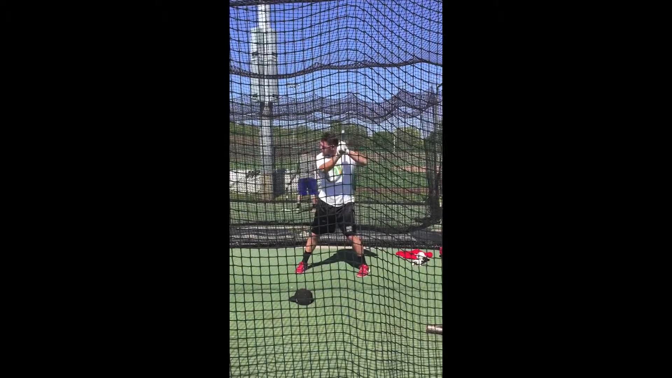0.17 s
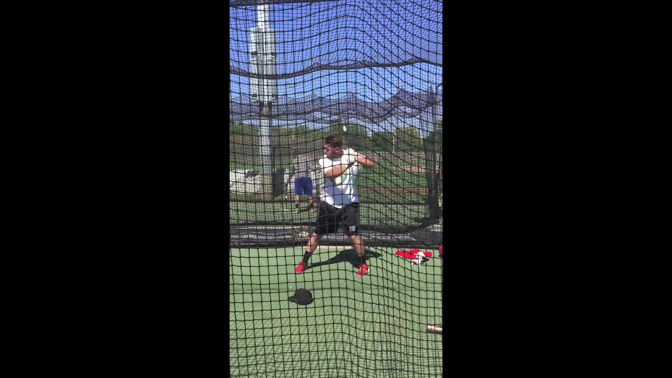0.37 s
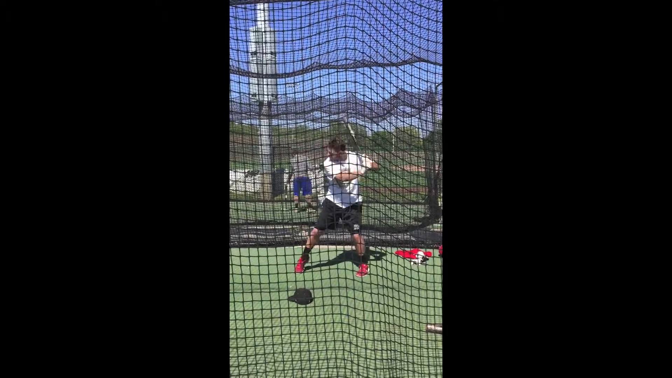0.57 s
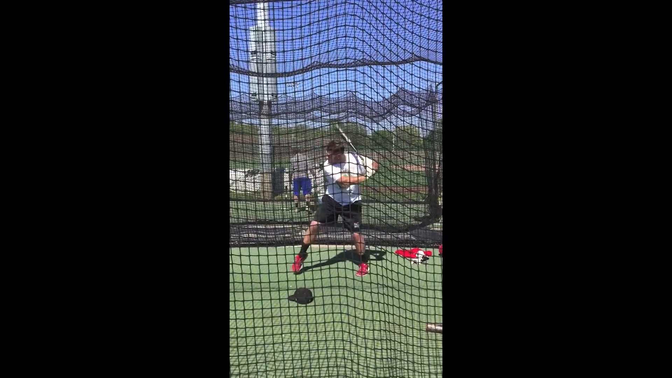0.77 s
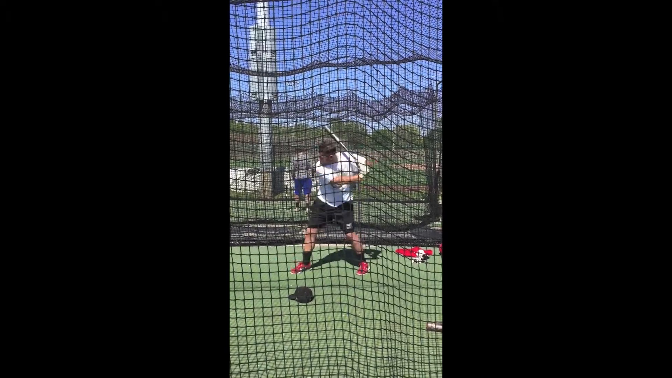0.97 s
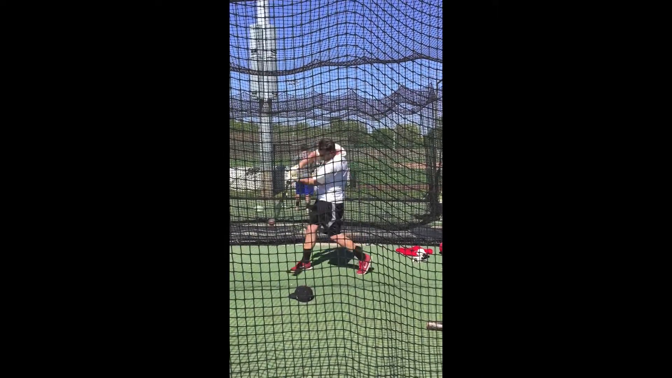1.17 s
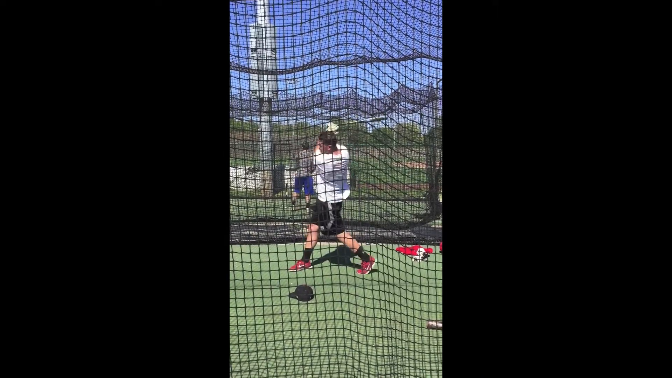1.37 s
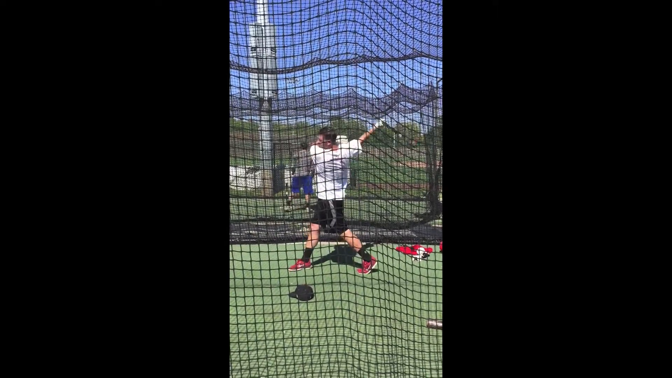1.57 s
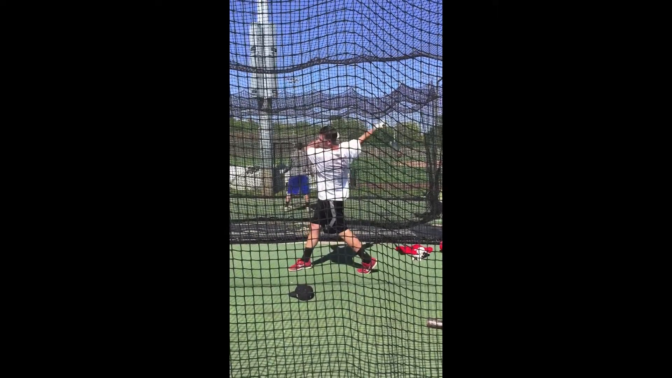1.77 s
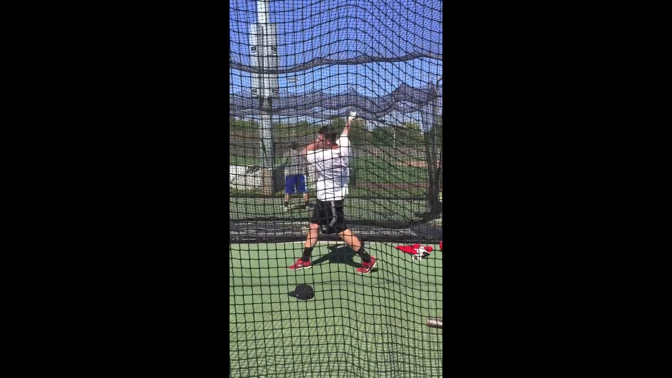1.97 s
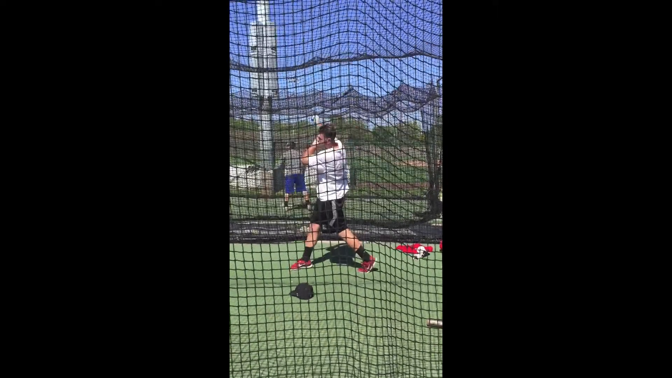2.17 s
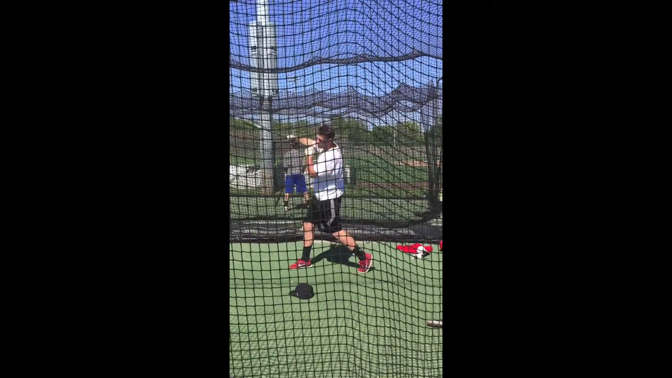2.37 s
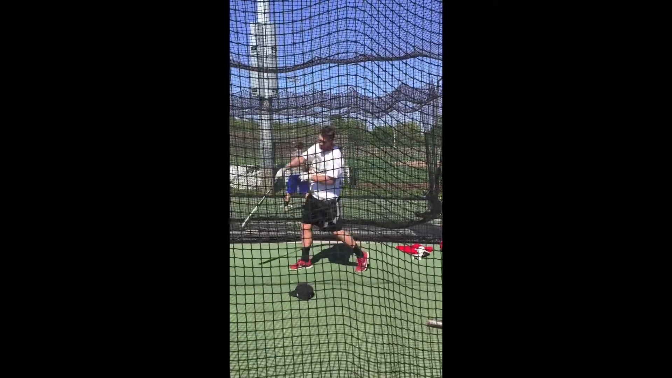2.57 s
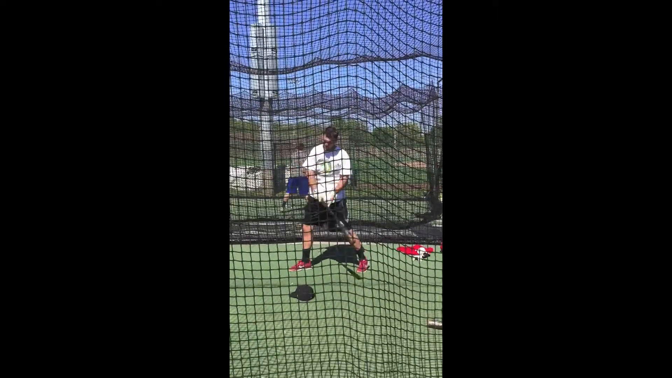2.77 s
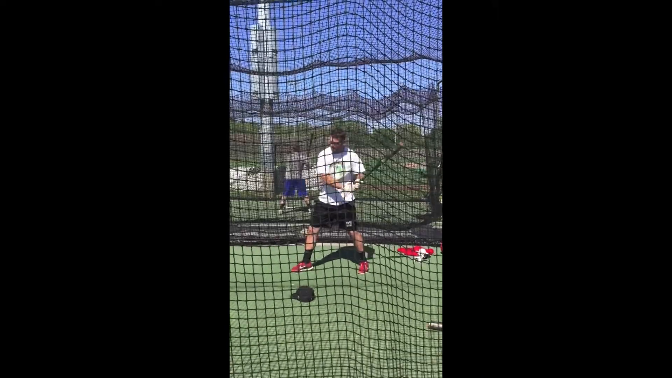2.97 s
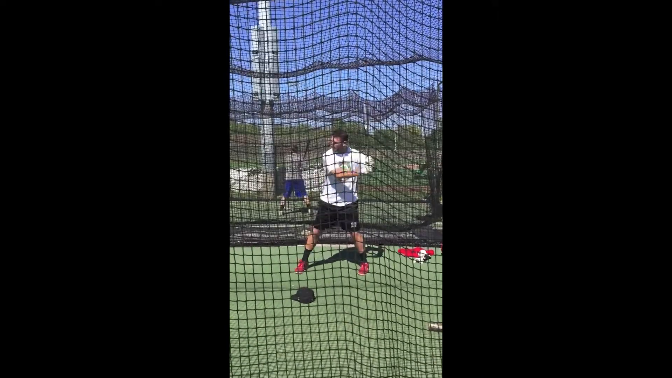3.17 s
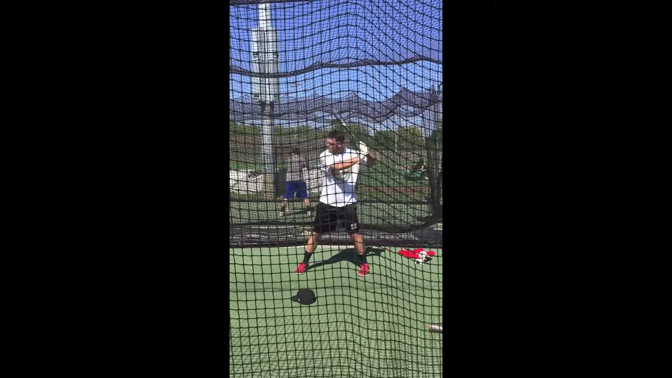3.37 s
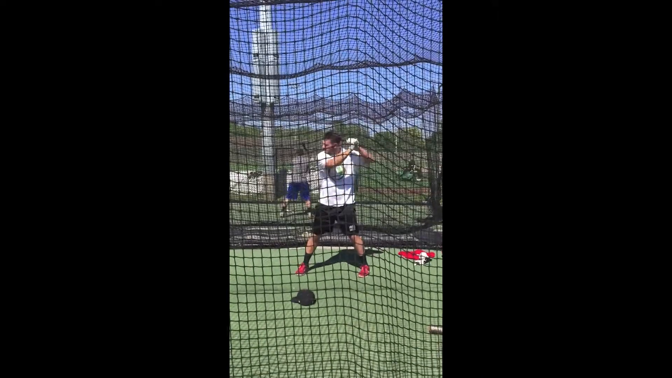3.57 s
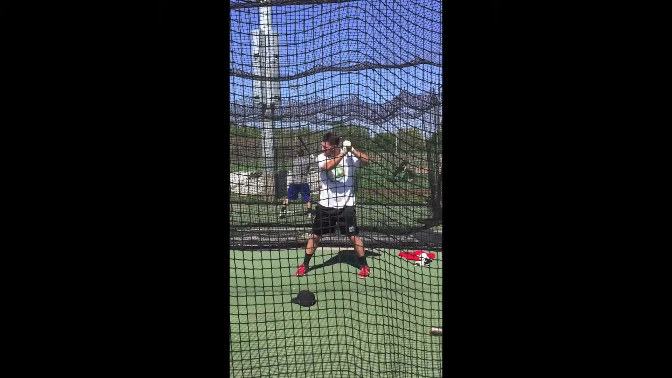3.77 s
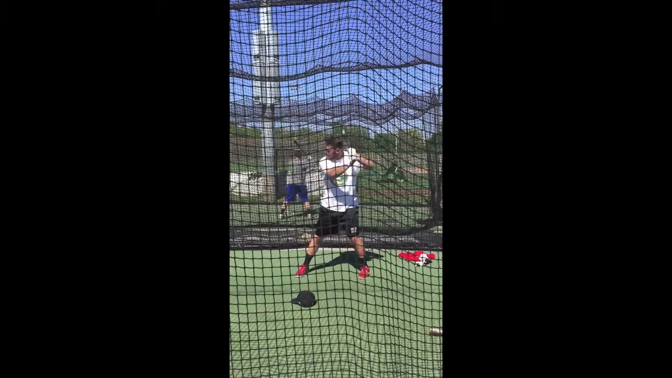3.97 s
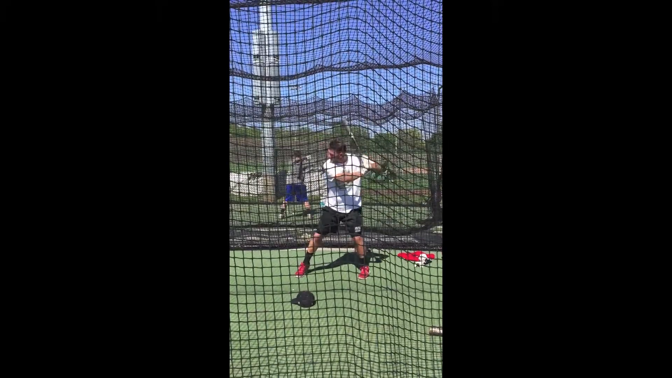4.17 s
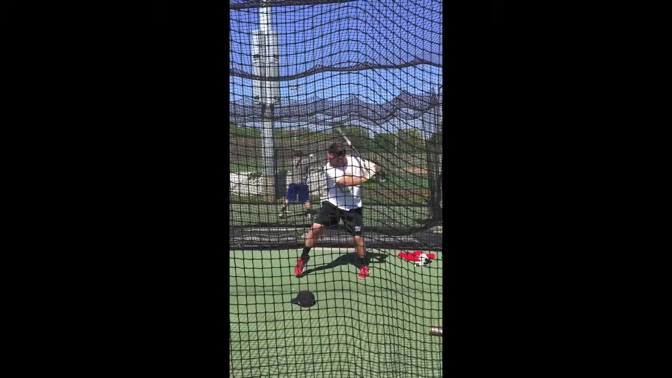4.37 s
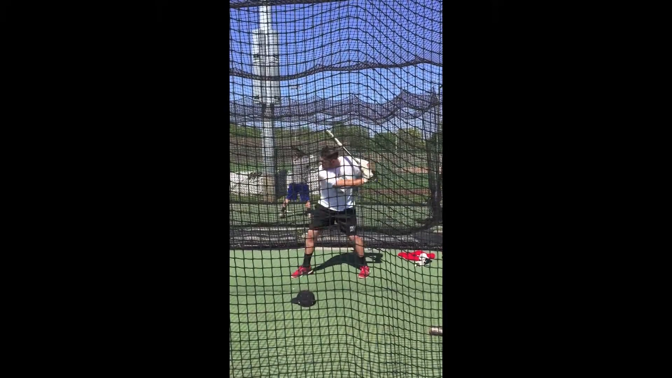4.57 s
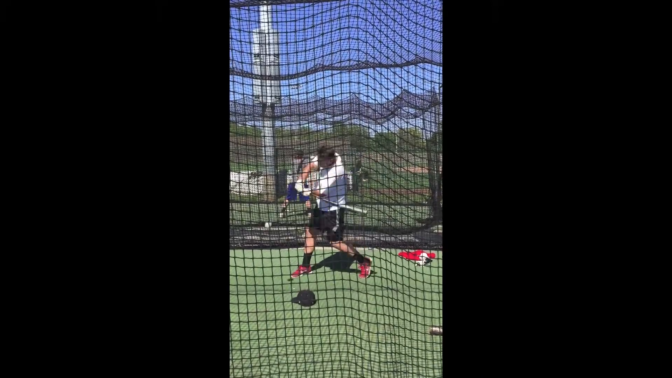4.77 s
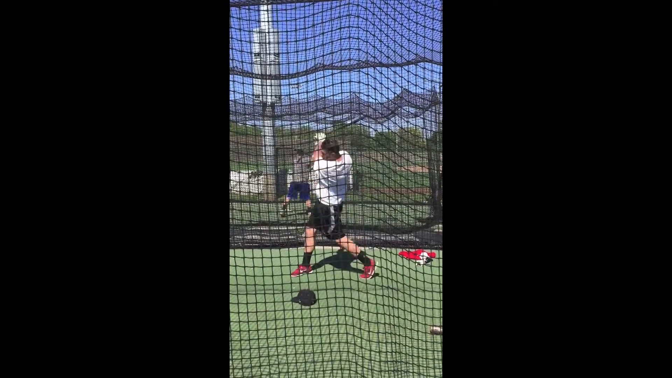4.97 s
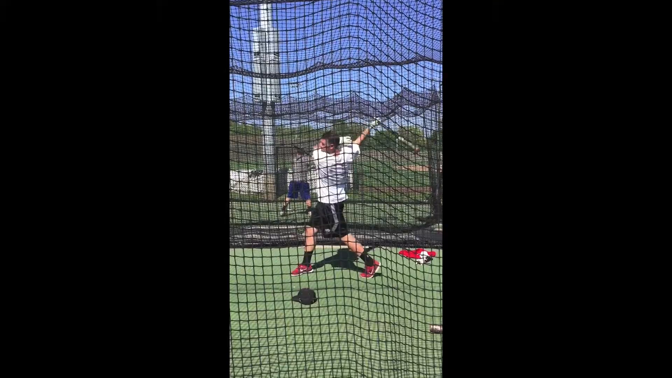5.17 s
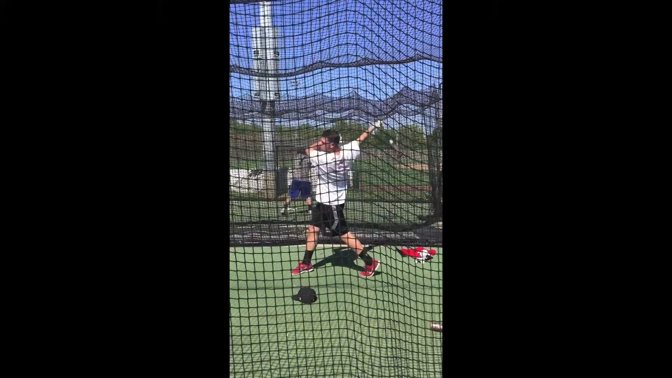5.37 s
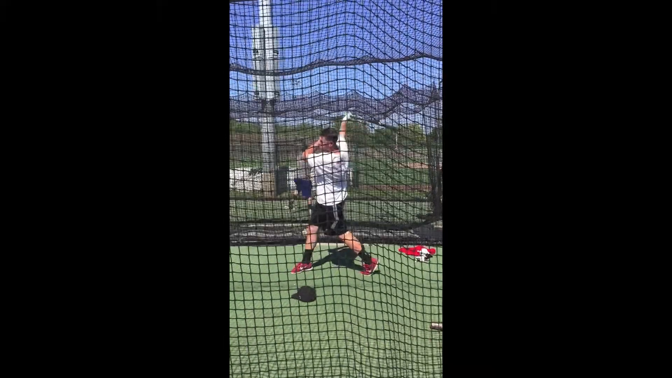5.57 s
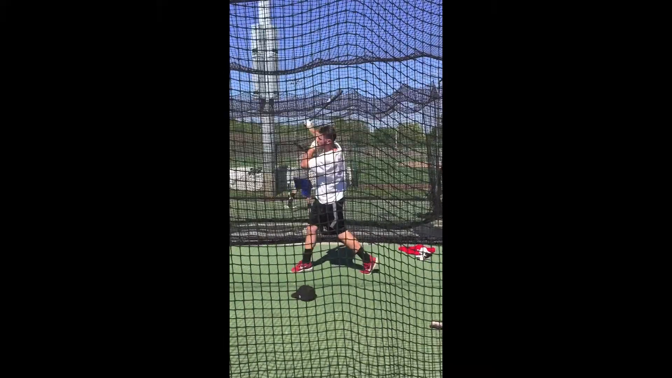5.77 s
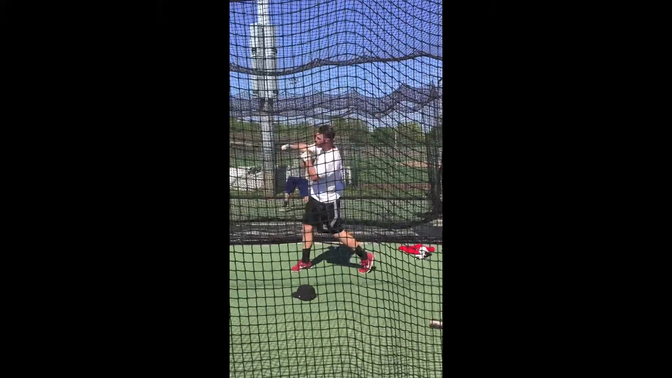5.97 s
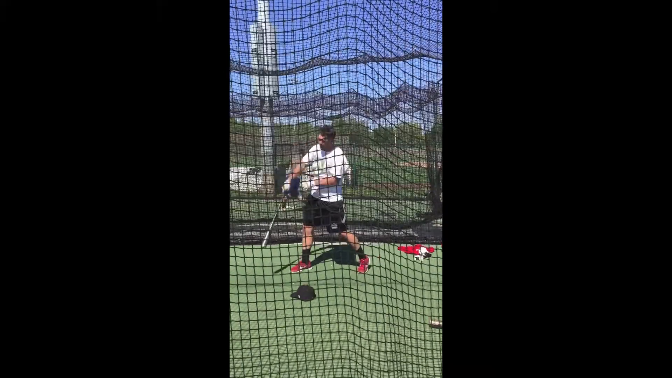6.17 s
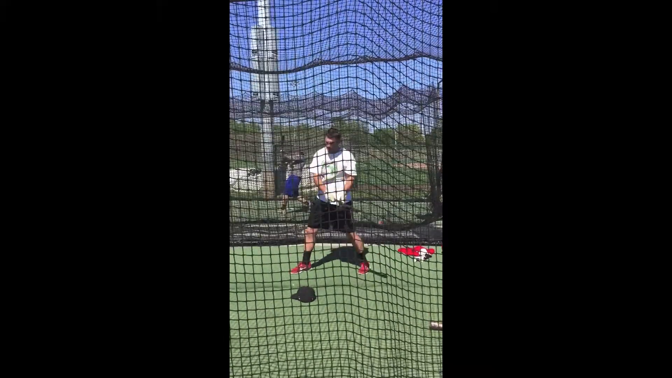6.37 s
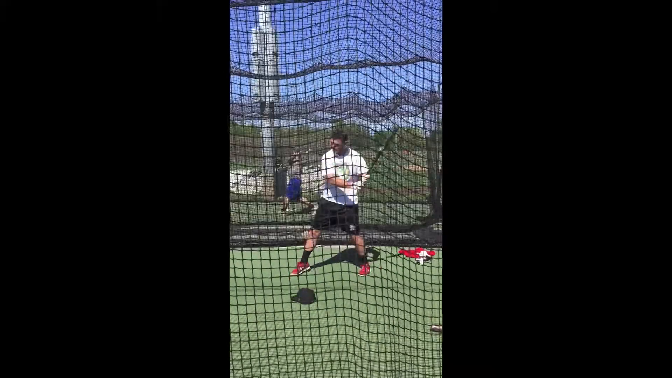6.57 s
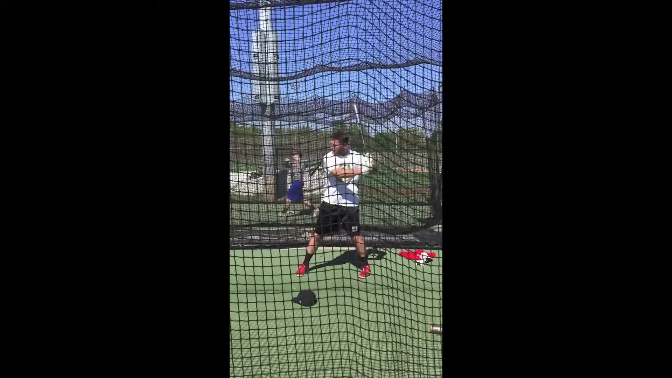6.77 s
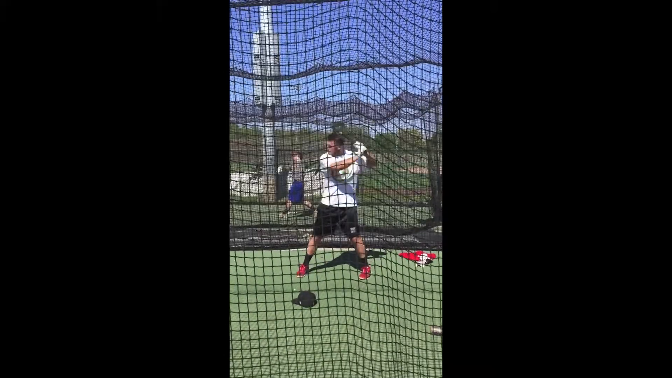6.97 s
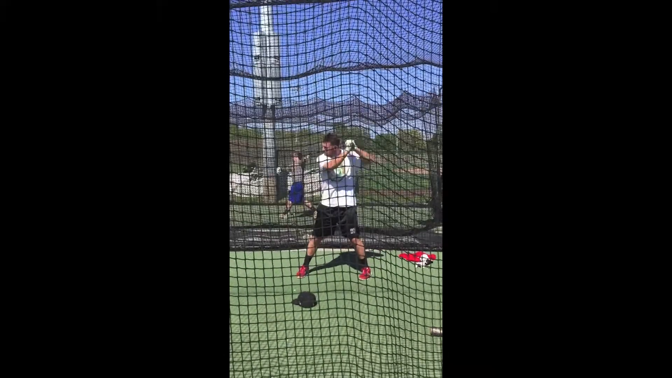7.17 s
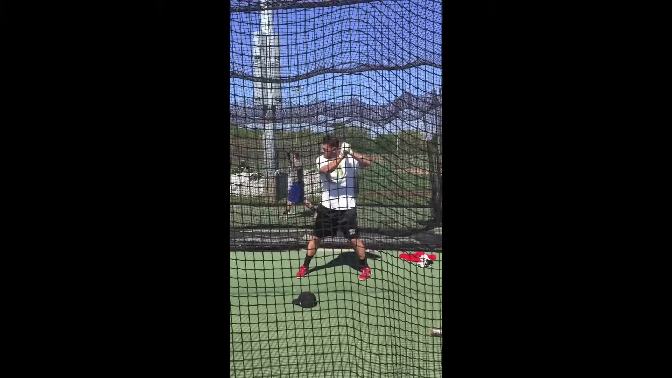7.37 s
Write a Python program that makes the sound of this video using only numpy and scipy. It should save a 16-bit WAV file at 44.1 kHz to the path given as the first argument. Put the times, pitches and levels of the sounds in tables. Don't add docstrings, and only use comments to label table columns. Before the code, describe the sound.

Over a puttering engine and airy hiss, two sharp metallic bat cracks ring and rustle netting, followed by a short dull thud with bounces.

```python
import sys
import numpy as np
from scipy import signal
from scipy.fft import rfft, irfft
from scipy.io import wavfile

SR = 44100
rng = np.random.default_rng(int(sys.argv[2]) if len(sys.argv) > 2 else 0)


def generate_wav(signal):
    frames = np.transpose(np.atleast_2d(signal))
    scaled = np.clip(frames, -1, 1) * 32767
    pcm = np.round(scaled).astype(np.int16)
    wavfile.write(sys.argv[1], SR, pcm)


def gain_from_db(level_db):
    decades = np.asarray(level_db, float) / 20
    return 10 ** decades


N = 327222
TIME = np.arange(N) / SR


def rms_one(x):
    return x / np.sqrt(np.mean(x ** 2) + 1e-20)


def in_time(rows):
    s, *columns = np.transpose(rows)
    return [np.interp(TIME, s, c) for c in columns]


def drift(rate):
    pole = np.exp(-80 * np.pi * rate / SR)
    noise = rng.standard_normal(N // 40 + 2002)
    slow = signal.lfilter([1], [1, -2 * pole, pole * pole], noise)[2000:]
    return np.interp(np.arange(N) / 40, np.arange(len(slow)), rms_one(slow - slow.mean()))


def ring(clicks, hz, t60):
    r, w = 1000 ** (-1 / (t60 * SR)), 2 * np.pi * hz / SR
    return signal.lfilter([0, np.sin(w)], [1, -2 * r * np.cos(w), r * r], clicks + 1e-18)


def coloured(spectrum, patchy_db=0, size=N):
    hz, level_db = np.transpose(spectrum)
    bins = np.maximum(np.arange(size // 2 + 1) * SR / size, 1)
    gain = gain_from_db(np.interp(np.log(bins), np.log(hz), level_db, -90, -90))
    shaped = rfft(rng.standard_normal(size)) * gain
    if not patchy_db:
        return rms_one(irfft(shaped, size))
    out, place = 0, 2 * np.log2(bins / hz[0])
    for k in range(int(2 * np.log2(hz[-1] / hz[0])) + 2):
        band = irfft(shaped * np.clip(1 - abs(place - k), 0, 1), size)
        out = out + band * gain_from_db(patchy_db * drift(22))
    return rms_one(out)


def add(track, s, sound):
    i = round(s * SR)
    track[i:i + len(sound)] += sound[:N - i]


def tones(rows, wobble_db):
    out, wobble = np.zeros(N), gain_from_db(wobble_db * drift(60))
    for centre, half, hz, glide, db in rows:
        t = np.arange(-3 * half, 3 * half, 1 / SR)
        swell = np.exp(-.7 * abs(t / half) ** 3)
        phase = 2 * np.pi * (hz * t + glide * t ** 2 / 2)
        add(out, centre + t[0], gain_from_db(db) * swell * np.sin(phase))
    return out * wobble


# time_s, ahead_firings (of the even speed-up)
HUNTING = [(0, 0), (1.3, -.04), (2.2, .05), (2.8, -.06), (3.9, -.085), (5.2, .085), (6.2, .01), (7.0, .02),
           (7.42, .06)]


def firings():
    ahead, = in_time(HUNTING)
    rate_hz, speed_up_hz_per_s = 20.4, .12
    return .4 + rate_hz * TIME + speed_up_hz_per_s * TIME ** 2 / 2 + ahead


def clatter():
    count = firings() + .1
    jolt = count.astype(int)
    burst = rng.standard_normal(N) * np.exp(-(count % 1) / .1)
    size_db = 4 * np.minimum(rng.exponential(1, 200), 2)
    modes = 0
    for hz in np.geomspace(2300, 13000, 15) * rng.uniform(.96, 1.04, 15):
        strength_db = size_db + rng.normal(0, 7, 200)
        mode = ring(burst * gain_from_db(strength_db)[jolt], hz, t60=.035)
        modes = modes + mode * (2300 / hz) ** 1.3
    return rms_one(modes)


# time_s, level_db
PASSING = [(0.0, -58.5), (0.6, -55.5), (1.0, -56), (1.67, -52), (2.04, -57), (2.21, -51), (2.97, -52.5),
           (3.26, -52), (3.57, -53), (3.9, -53.5), (4.51, -51.5), (4.85, -55), (5.7, -58.5), (6.08, -61.5),
           (6.61, -65), (7.42, -64)]
# pitch_hz, density_db (per Hz)
ROAR = [(330, -17), (450, -3.5), (620, -7.5), (780, -1), (920, -8), (1100, -25.5)]
TRAFFIC_HISS = [(600, -10), (900, -2.5), (1200, 2.5), (1500, -3.5), (2200, -19.5), (3200, -15)]
AIR = [(1180, -30), (2000, 2.5), (3550, -4), (4990, -12.5), (8700, -16.5), (10300, -23.5), (14500, -24),
       (16000, -38)]


def surroundings():
    roar_db, = in_time(PASSING)
    throb_db = 0.6 * np.cos(2 * np.pi * (firings() + .16))
    hiss_db = -62.5 + .4 * (roar_db + 57.5)
    air_db = -66.5 + 0.69 * (roar_db + 55.5)
    roar = gain_from_db(roar_db - 1.6) * gain_from_db(throb_db / 2) * coloured(ROAR)
    hiss = gain_from_db(hiss_db + throb_db) * coloured(TRAFFIC_HISS, patchy_db=1.5)
    air = gain_from_db(throb_db + .9 * drift(70)) * coloured(AIR, patchy_db=1.6)
    return roar + hiss + gain_from_db(air_db + 3.5) * (air + gain_from_db(-9) * clatter())


# centre_s, half_width_s, pitch_hz, glide_hz_per_s, peak_db
CHIRPS = [
    (2.19, .025, 1130, 900, -55),
    (2.21, .04, 1350, 600, -58),
    (2.24, .035, 1220, -900, -56),
    (2.05, .025, 3620, -900, -67),
    (5.955, .025, 3250, -500, -64),
    (6.045, .028, 2300, -17000, -60),
    (6.305, .012, 3180, -9000, -64),
    (6.64, .012, 3500, -18000, -63),
    (6.87, .018, 2530, -900, -61),
    (6.825, .008, 6350, 100, -64),
]


def chirps():
    return tones(CHIRPS, wobble_db=4)


# time_s, exhaust_db, upper_db (pipe mouth turned this way)
ENGINE = [(0.0, -42, -4), (0.35, -44.5, 2.5), (0.87, -41.5, 0.5), (1.5, -42, 1), (2.0, -42, 2),
          (2.3, -41, -1.5), (2.85, -44, 3), (3.24, -39.5, -1.5), (3.8, -46, 7.5), (4.13, -40.5, -1),
          (4.8, -43, 1.5), (5.35, -43, -0.5), (5.56, -41, -3.5), (6.49, -42, -2.5), (7.19, -39.5, -15),
          (7.42, -39, -16)]
# pitch_hz, level_db, t60_s
PIPE_LOW = [(61.3, -34, .12), (102.7, 8, 0.2), (130.2, 7, 0.12)]
PIPE_HIGH = [(172.5, 7.5, 0.073), (211.2, 1.5, 0.15), (297.5, -2.5, 0.055), (342, -19.5, 0.18)]
# pitch_hz, density_db (per Hz)
RUMBLE = [(25, -34), (40, 0.5), (100, 5.5), (220, 1), (360, -10), (470, -37.5), (600, -47.5)]


def exhaust(count):
    exhaust_db, upper_db = in_time(ENGINE)
    fired = np.append(0, np.diff(np.floor(count)))
    low = sum(gain_from_db(db) * ring(fired * gain_from_db(.8 * drift(13)), hz, t60) for hz, db, t60 in PIPE_LOW)
    high = sum(gain_from_db(db) * ring(fired * gain_from_db(1.8 * drift(26)), hz, t60) for hz, db, t60 in PIPE_HIGH)
    puffs = rms_one(low) + gain_from_db(upper_db + 1.1) * rms_one(high)
    puffs = signal.sosfilt(signal.butter(8, 370, fs=SR, output="sos"), puffs)
    walls = [(.0095, 0.35), (0.02628, 0.17), (0.01807, 0.12)]   # delay_s, gain
    first, second, third = [gain * np.roll(puffs, round(s * SR)) for s, gain in walls]
    puffs = puffs + first + second + third
    hum = gain_from_db(-14) * np.sin(2 * np.pi * (5 * count + 0.34))
    return gain_from_db(exhaust_db + 3.0) * (puffs + gain_from_db(-3.5) * coloured(RUMBLE) + hum)


def rattle(count, hz, width, unevenness_db):
    strength_db = rng.normal(0, unevenness_db, 200)[np.rint(count).astype(int)]
    shaken = rng.standard_normal(N) * gain_from_db(strength_db + 3.5 * np.cos(2 * np.pi * count))
    return rms_one(ring(ring(shaken, hz, 1.4 / width), hz, 1.4 / width))


# time_s, level_db
SHAKE = [(0.0, -51.5), (.68, -50), (1.2, -54), (1.6, -53.5), (1.96, -61), (2.54, -49), (2.9, -57.5),
         (3.64, -53), (4.13, -60.5), (5.6, -56.5), (7.42, -59.5)]
# pitch_hz, width_hz, level_db
CASING = [(1706, 73, 0.5), (1802, 90, -2.5)]
PANELS = [(2430, 130, -5), (3590, 110, -15), (4050, 110, -19), (5270, 70, -23)]


def casing(count):
    (_, upper_db), (whine_db,) = in_time(ENGINE), in_time(SHAKE)
    panels_db = -5.5 + .4 * upper_db + drift(1.3)
    panels = sum(gain_from_db(db) * rattle(count, hz, width, unevenness_db=4) for hz, width, db in PANELS)
    whine = sum(gain_from_db(db - 3) * rattle(count, hz, width, unevenness_db=1.5) for hz, width, db in CASING)
    return gain_from_db(whine_db - 3.0) * (whine + gain_from_db(panels_db) * panels)


def engine():
    count = firings() + .16 + .006 * drift(12.0)
    return exhaust(count) + casing(count)


# start_s, peak_db
SQUEAKS = [
    (0.0204, -64),
    (0.1186, -61),
    (0.169, -64),
    (0.2179, -57.5),
    (0.297, -64),
    (0.4219, -61),
    (0.7073, -65),
    (0.7622, -59),
]


def squeaks():
    half_s, pitch_hz = 0.0101, 5270
    return tones([(s + half_s, half_s, pitch_hz, 0., db - 4) for s, db in SQUEAKS], wobble_db=4.5)


# start_s, peak_db, pitch_hz
TICKS = [(0.296, -48, 5300), (0.4456, -47, 3980), (0.504, -49, 3960), (0.5621, -53, 3500),
         (0.9017, -58, 3500), (1.5294, -51, 3530), (1.766, -45, 3400), (1.869, -62, 4240),
         (2.2647, -52, 3980), (2.643, -46.5, 4060), (3.2214, -50, 5460), (3.3205, -53, 5440),
         (3.7116, -53, 3480), (3.991, -55, 3670), (4.183, -54.5, 7700), (4.393, -47, 4100),
         (4.4957, -42, 4160), (4.808, -45, 3510), (5.1586, -46, 3520), (5.3981, -62.5, 3850),
         (5.8007, -55.5, 8900), (6.9394, -56.5, 6500),
         (1.2512, -47, 3500),
    (1.2518, -52, 9000),
    (4.879, -47, 3700),
]


def ticks():
    out, t = np.zeros(N), TIME[:2048]
    envelope = np.exp(-t / .009) * (1 - np.exp(-t / .002))
    for s, db, hz in TICKS:
        colour = [(hz / 2, -24), (hz / 1.05, -14), (hz, 0), (hz * 1.05, -14), (hz * 1.4, -16), (hz * 2, -34)]
        add(out, s, gain_from_db(db - 3) * coloured(colour, size=len(t)) * envelope)
    return out


# start_s, length_s, mesh_db, cords_db, fade_db (over the length)
SWAYS = [
    (1.566, 0.075, -42, -49, 18),
    (1.652, 0.53, -63, -63, 3.5),
    (5.295, 0.15, -42, -54, 16),
    (5.44, 0.29, -41, -45, 25.5),
    (6.34, 0.076, -26.5, -43, 22),
    (6.397, 0.28, -45, -67.5, 14),
    (6.775, 0.17, -43, -53, 28),
]
# pitch_hz, density_db (per Hz)
MESH = [(500, -8), (1000, -5), (2000, -3.5), (3500, -3), (5500, -18), (8000, -36)]
CORDS = [(4000, -9), (6000, -2), (7500, -1.5), (10000, -9.5), (16000, -14)]


def net():
    mesh, cords = np.zeros((2, N))
    for s, length, mesh_db, cords_db, fade_db in SWAYS:
        t = TIME[:round(length * SR)]
        edges = np.clip(np.minimum(t / 0.0089, (length - t) / 0.025), 0, 1)
        sway = gain_from_db(-fade_db * t / length) * edges
        add(mesh, s, gain_from_db(mesh_db) * sway)
        add(cords, s, gain_from_db(cords_db) * sway ** 1.17)
    mesh = gain_from_db(-6.5 + 3.5 * drift(120)) * mesh * coloured(MESH)
    return mesh + gain_from_db(-5 + 2.5 * drift(90)) * cords * coloured(CORDS)


# start_s, peak_db, pitch_hz, t60_s, puff_db
KNOCKS = [(1.571, -41, 1620, 0.013, 2), (5.302, -34, 2140, 0.031, -2.5), (5.45, -52, 1450, .012, -5),
          (6.3281, -10.5, 2820, 0.0074, -1.5), (6.3287, 3, 1320, 0.0043, -16),
          (6.3324, -18, 1400, 0.007, -12), (6.3364, -21, 1570, 0.012, -12),
          (6.339, -18.5, 1520, 0.011, -0.5), (6.3482, -18.5, 1800, 0.006, -2),
          (6.355, -16.5, 1740, 0.008, -4), (6.364, -21, 2700, 0.0073, -9), (6.3718, -27, 1690, 0.005, -3),
          (6.384, -40, 2500, .006, -6), (6.398, -39, 1480, 0.006, -3), (6.4143, -25, 2970, 0.0089, -9.5),
          (6.779, -36.5, 2400, 0.016, -6), (6.789, -40, 1240, 0.03, -8), (6.797, -39, 2500, .015, -4),
          (6.809, -41, 1290, .02, -8)]
# pitch_hz, density_db (per Hz)
NET_PUFF = [(500, -20), (900, 3), (1750, 10), (3000, 2.5), (6650, -10), (10000, -18.5), (16000, -31.5)]


def knocks():
    out, t = np.zeros(N), TIME[:4096]
    skips = [(6.4392 + k * .004, -20 - 1.1 * (k - 2.4) ** 2, 1300, .005, -20) for k in range(6)]
    for s, db, hz, t60, puff_db in [*KNOCKS, *skips]:
        thud = ring(1. * (t == 0), hz, max(t60, .002))
        puff = gain_from_db(puff_db) * coloured(NET_PUFF, size=len(t)) * np.exp(-t / .002)
        add(out, s, gain_from_db(db) * (thud + puff) * (1 - np.exp(-t / .0003)))
    return out


HIT_S = [1.2747, 4.9026]
# delay_s (after contact), peak_db, lobe_db (re peak), echo_db, stretch (of echo delays)
SWINGS = [
    (.0343, -17, -13.5, -2.5, 1.03),
    (0.044, -15, -36, 4, .97),
]
# delay_s (after contact), half_width_s, pitch_hz, glide_hz_per_s, level_db
RETURNS = [
    (.094, 0.015, 2940, -300, -43),
    (0.13, .016, 2950, -300, -44),
    (0.154, 0.029, 2460, 902, -40),
    (.2, 0.037, 2870, -300, -46),
    (.254, .02, 2750, 598, -43),
    (.325, 0.066, 2940, 300, -53),
]


def beams():
    direct, returns = [], []
    barrel_hz = 2683
    for s, (delay, db, lobe_db, echo_db, stretch) in zip(HIT_S, SWINGS):
        direct.append((s + delay, .0165, barrel_hz, 0., db))
        direct.append((s + delay + .0275, .007, barrel_hz + 20, 0., db + lobe_db))
        for late, half, hz, glide, level_db in RETURNS:
            returns.append((s + stretch * late, half, hz, glide, level_db + echo_db))
    wavering = tones(returns, wobble_db=0) * (1 + .7 * drift(50))
    return tones(direct, wobble_db=1.2) + gain_from_db(-8) * wavering


# about_s, peak_db, crack_db, tail_db (echoes), thump_db
HITS = [
    (1.2746, -6, 12, -20.5, -19),
    (4.9024, -5, 14, -20, -13.5),
]
# pitch_hz, level_db, t60_s
BAT = [
    [(870, -3, 0.021), (1120, -23.5, 0.018), (1970, -13, 0.0081), (2460, 0, 0.027), (2807, -13.5, 0.085),
     (2880, -3.5, 0.012), (3800, -10.5, 0.033), (4140, -9.5, 0.034)],
    [(526, -22, 0.057), (1400, -3.5, 0.025), (2082, -5.5, 0.01), (2470, 2, 0.039), (2675, -10.5, 0.13),
     (3370, 5.5, 0.0081), (3723, -4, 0.039), (4070, -13.5, 0.033)],
]
# pitch_hz, level_db
BALL = [(700, 4.5), (1140, 3.5)]
# pitch_hz, density_db (per Hz)
CRACK = [(400, -13.5), (1500, -11), (2700, 4), (4500, -4.5), (6000, -8.5), (8000, -14.5), (12000, -20),
         (16500, -27.5)]
TAIL = [(300, -21.5), (600, -7), (1500, -3.5), (2600, 4), (4300, -5), (6000, -12.5), (16000, -29)]
SMEAR = [(2300, -30), (2500, -8), (2780, -6), (2920, 0), (3050, -8), (3300, -30)]
SWISH = [(500, -20), (1000, -3), (2800, 0), (4000, -15), (9000, -28)]


def bat():
    out, t = np.zeros(N), TIME[:16384]
    click = 1. * (t == 0)
    near_echoes = np.exp(-t / 0.022) / (1 + np.exp((t - .07) / .004))
    far_echoes = np.exp(-t / 0.065) / (1 + np.exp((t - .16) / 0.0062))
    for s, (_, peak_db, crack_db, tail_db, thump_db), modes in zip(HIT_S, HITS, BAT):
        body = sum(gain_from_db(db + 1.5) * ring(click, hz, t60) for hz, db, t60 in modes)
        body = body * (1 - np.exp(-t / .001))
        pop = sum(gain_from_db(db) * np.sin(2 * np.pi * hz * t) for hz, db in BALL)
        pop = pop * np.exp(-((t - .0024) / .0017) ** 2)
        crack_decay = np.exp(-t / .0007) + .07 * np.exp(-t / .005)
        crack = gain_from_db(crack_db) * coloured(CRACK, size=len(t)) * crack_decay
        tail = gain_from_db(tail_db) * coloured(TAIL, size=len(t)) * (near_echoes + gain_from_db(-12) * far_echoes)
        smear_level = gain_from_db(-39.5 + 4 * drift(25)[:len(t)])
        smear = smear_level * coloured(SMEAR, size=len(t)) * np.exp(-t / 0.17)
        thump = gain_from_db(thump_db) * ring(click, 69.0, 0.13)
        add(out, s, gain_from_db(peak_db) * (body + pop + crack + tail + smear + thump))
        swish = gain_from_db(-43) * coloured(SWISH, size=2048) * np.exp(-t[2047::-1] / .011)
        add(out, s - 2048 / SR, swish)
    return out


def ducking():
    drop_db, hold_s, recover_s = -3, 0.24, 0.04
    late = TIME - np.array(HIT_S)[:, None]
    recovery = np.exp(-np.maximum(late - hold_s, 0) / recover_s)
    return gain_from_db(drop_db * np.sum((late > 0) * recovery, axis=0))


def scene():
    background = ducking() * (surroundings() + engine())
    near = ticks() + net() + knocks() + beams() + bat()
    return (background + chirps() + squeaks() + near)[None]


def roll_off(x):
    return signal.sosfilt(signal.butter(12, 16830, fs=SR, output="sos"), x)


def record(dry):
    thin = signal.sosfilt(signal.butter(2, 65, "high", fs=SR, output="sos"), dry)
    overload = .65
    clipped = overload * thin / (overload ** 6 + thin ** 6) ** (1 / 6)
    limited = signal.sosfilt(signal.cheby2(10, 60, 17000, fs=SR, output="sos"), clipped)
    mix = np.clip(limited, -.76, .76)
    return roll_off(mix)


dry = scene()
out = record(dry)
generate_wav(out)
```